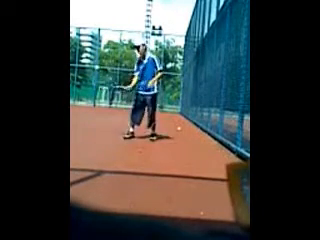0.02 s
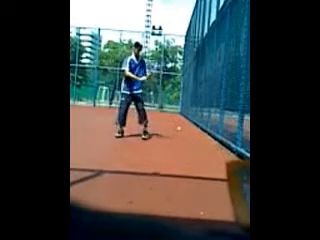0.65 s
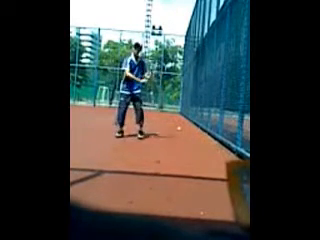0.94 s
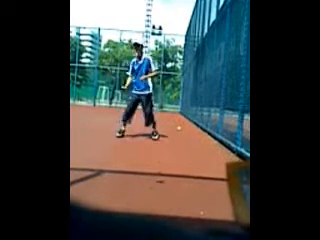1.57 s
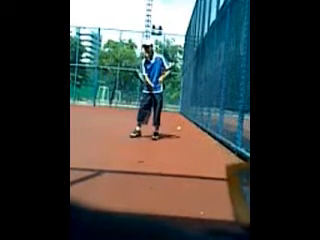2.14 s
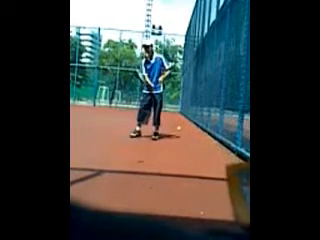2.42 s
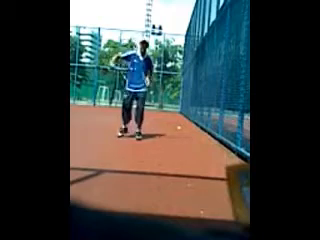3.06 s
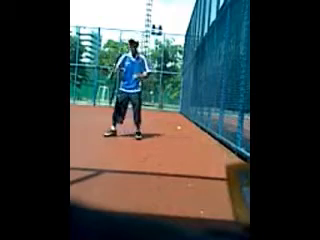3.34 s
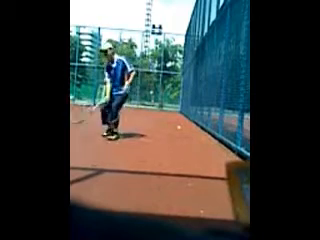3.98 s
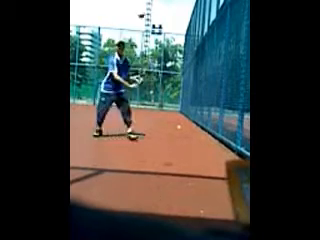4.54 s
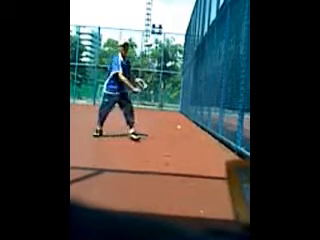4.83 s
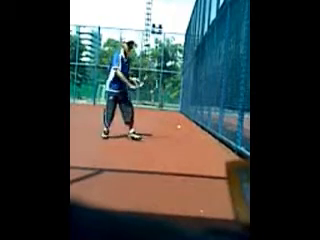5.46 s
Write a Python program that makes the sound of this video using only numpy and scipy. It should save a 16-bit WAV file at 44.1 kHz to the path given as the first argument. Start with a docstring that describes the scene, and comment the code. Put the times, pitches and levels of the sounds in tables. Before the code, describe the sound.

A tennis ball is hit against a practice wall on an outdoor court, with the microphone near the wall. The racket strikes farther off with a hollow pop and a thin, short echo at about 0.1, 1.1, 2.1, 3.0, 3.9, 4.8 and 5.7 seconds. In between, the ball meets the wall with a louder, hard, dry knock and pop at about 0.5, 1.5, 2.4, 3.4, 4.3 and 5.1 seconds. Shoes scuff softly, most clearly around 0.2, 1.8 and 3.2 seconds, with light, dull steps near 1.8, 2.7 and 5.4 seconds. Clothes swish very faintly after the strokes. Underneath, a distant engine gives a low, wavering hum and rumble, strongest in the first half second and slowly fading as it draws away. The whole sound is slightly dull, with little treble.

```python
"""Tennis against a practice wall

An outdoor hard court, the microphone near the wall, the player farther off. Each blow on racket or
wall is a knock and a crack at contact, then the hollow pop of the air in the ball as it springs back.
Shoes and clothes rustle between the strokes, and a distant engine hums and slowly draws away."""
import sys
import numpy as np
from scipy import signal
from scipy.fft import rfft, irfft
from scipy.io import wavfile

SR = 44100
rng = np.random.default_rng(int(sys.argv[2]) if len(sys.argv) > 2 else 0)


def wav_out(sig):
    """Save sig, one row per channel (or a flat mono array), as 16-bit PCM at SR to the path in sys.argv[1]."""
    wavfile.write(sys.argv[1], SR, np.round(np.clip(np.atleast_2d(sig).T, -1, 1) * 32767).astype(np.int16))


N = 251370
TIME = np.arange(N) / SR
FREQS = np.fft.rfftfreq(N, 1 / SR)

# racket strokes: start_s, knock_db, crack_db, dwell_s, pop_db, pop_hz, ground_db, court_db, swish_db
STROKES = [(0.0907, -14, -26.5, 0.0017, 5.5, 1085, -19, -13.5, -66),
           (1.088, -17.5, -24.5, 0.0029, 0.5, 1196, -12, -20.5, -57),
           (2.0511, -14.5, -22.5, 0.0026, -8, 1025, -0.5, -10, -68),
           (3.0082, -23.5, -26, .004, -6, 1200, -18.5, -12, -62.5),
           (3.9323, -13, -25, 0.00285, 3.5, 1030, -4.5, -11, -66.5),
           (4.8119, -18.5, -29, 0.00444, -1.5, 1053, -7.5, -7, -80.5),
           (5.6514, -26, -26.5, 0.0034, 0.5, 1068, -5.5, -13.5, -72)]


def amp(db):
    """Decibels to gain."""
    return 10 ** (np.asarray(db) / 20)


def unit(x):
    """Scales to rms 1."""
    return x / np.sqrt(np.mean(x ** 2) + 1e-20)


def read(points, hz):
    """Reads a curve on a log-frequency axis."""
    point_hz, value = np.transpose(points)
    return np.interp(np.log(hz + 1), np.log(point_hz), value)


def add(mix, start_s, sound):
    """Mixes a sound in at start_s."""
    part = mix[max(round(start_s * SR), 0):][:len(sound)]
    part += sound[:len(part)]


def noise(spectrum_db, n=N):
    """Noise of rms 1 with the given spectral shape."""
    return unit(irfft(rfft(rng.standard_normal(n)) * amp(spectrum_db), n))


def drift(hz):
    """Slow random motion of rms 1, up to about hz changes a second."""
    return noise(-10 * (FREQS / hz) ** 2)


def engine(flutter_db=2.0, waver=.011, throb=.55):
    """A far engine: a wavering hum that fades faster than the rumble around it."""
    # low rumble of the far engine, fading overall, swelling briefly with a shoe scuff: time_s, level_db
    rumble_levels = [(0, -27), (.5, -29), (.95, -35), (1.7, -35), (2.15, -35), (2.6, -35), (2.95, -40.5),
                     (3.25, -35), (3.6, -40), (4.6, -43), (5.15, -41), (5.7, -50.5)]
    # spectra of the low, middle and high engine noise: frequency_hz, relative_db
    rumble_shape = [(20, -30), (50, -23.5), (100, -14), (160, -10.5), (200, -1), (265, .5), (360, -11),
                    (450, -5), (545, -2.5), (650, -18), (900, -21.5), (1500, -64)]
    roar_shape = [(400, -15.5), (650, -1), (800, 4), (1000, -2), (1400, -8.5), (1900, -23), (2600, -28),
                  (4000, -55)]
    hiss_shape = [(900, 2), (1800, 5.5), (2700, 1.5), (3400, 0), (3900, -9.5), (4500, -20), (5000, -46)]
    rumble_db = np.interp(TIME, *np.transpose(rumble_levels))
    lost_db = rumble_db[0] - rumble_db
    # the pitch settles quickly as the engine eases off, then sags slowly
    hum_hz = 198.5 + 6 * np.exp(-TIME / .22) - 1.1 * TIME
    turns = np.cumsum(hum_hz * (1 + waver * drift(hz=9))) / SR
    tone = np.sin(2 * np.pi * turns) * (1 + throb * drift(hz=10))
    hum = amp(rumble_db[0] - 2 - 1.28 * lost_db) * unit(tone)
    rumble = amp(rumble_db) * noise(read(rumble_shape, FREQS))
    nearest_s, passing_s = 0.069, 0.24
    distance = np.hypot(1, (TIME - nearest_s) / passing_s)  # 1 at the nearest point
    roar = amp(-29) / distance * noise(read(roar_shape, FREQS))
    hiss = amp(-54.5 - 0.91 * lost_db) * noise(read(hiss_shape, FREQS))
    # moving air makes the far noise flutter
    return hum + sum(part * amp(flutter_db * drift(hz=18)) for part in (rumble, roar + hiss))


def ring(t, hz, t60, swell_s):
    """A resonance that swells up from t = 0 and dies away."""
    t = np.maximum(t, 0)
    return np.sin(2 * np.pi * hz * t) * (1 - np.exp(-(t / swell_s) ** 2)) * 10 ** (-3 * t / t60)


def blow(modes, knock_db, knock_hz, dwell_s, pop_db, pop_hz, pop_t60, swell_s, ground_s, ground_db):
    """The ball knocks and flattens, then springs back and its air pops, echoed by the ground."""
    t = np.arange(SR // 4) / SR
    # pressed flat, the ball is heavily damped; the struck body rings along
    knock = ring(t, knock_hz, t60=0.013, swell_s=0.00054)
    body = sum(amp(db) * ring(t, hz, t60, swell_s=0.00057) for hz, db, t60 in modes)
    pop = ring(t - dwell_s, pop_hz, pop_t60, swell_s)
    ground_echo = amp(ground_db) * ring(t - dwell_s - ground_s, pop_hz, pop_t60, swell_s)
    return amp(knock_db) * (knock + body) + amp(pop_db) * (pop + ground_echo)


def crack(snap_s, rise_s, scatter_db, scatter_t60, top_hz, slap_t60=.032, snap_db=-4):
    """The felt slaps and the shell snaps back; the ground scatters both and swallows their top."""
    # spectrum of slapped felt and rubber: frequency_hz, relative_db
    felt_shape = [(40, -15), (200, 1.5), (700, 17.5), (1400, 15), (1950, 0.5), (2700, 1.5), (3400, 6),
                  (4000, -5), (4600, -9), (5100, -37)]
    t = np.arange(SR // 4) / SR
    hz = np.fft.rfftfreq(len(t), 1 / SR)
    felt_db = read(felt_shape, hz)
    felt = noise(felt_db, len(t))
    dull_felt = noise(felt_db - 10 * np.log10(1 + (hz / top_hz) ** 20), len(t))
    slap = amp(-60 * t / slap_t60)
    snap = amp(snap_db) * np.exp(-((t - snap_s) / .003) ** 2)
    scatter = amp(scatter_db - 60 * t / scatter_t60)
    return (np.hypot(slap, snap) * felt + scatter * dull_felt) * (1 - np.exp(-t / rise_s))


def echoes(x, gain_db):
    """The direct sound with its single echoes off fence and ground."""
    # early reflections: delay_s, relative_db
    reflections = [(0.01, -16), (0.016, -22.5), (0.0202, -25), (.0315, -35)]
    out = x.copy()
    for delay_s, db in reflections:
        add(out, delay_s, amp(db + gain_db) * x)
    return out


def court(x, build_up_s=0.0018, taps_per_s=1200):
    """The open court's thin tail, scattered by fences and trees."""
    # decay of the tail: frequency_hz, t60_s
    decay = [(200, 4), (1000, 0.44), (3500, 0.5)]
    # colour of the tail: frequency_hz, relative_db
    colour = [(150, -4.5), (650, -8.5), (1080, -5.5), (1600, 2.5), (3300, -5), (3900, -10), (4800, -7)]
    t = np.arange(SR) / SR
    taps = rng.standard_normal(SR) * (rng.random(SR) < taps_per_s / SR)
    taps *= 1 - np.exp(-(t / build_up_s) ** 2)
    hz, age_s, spectra = signal.stft(taps, SR, nperseg=256)
    spectra *= amp(read(colour, hz)[:, None] - 60 * age_s / read(decay, hz)[:, None])
    tail = signal.istft(spectra, SR, nperseg=256)[1]
    return signal.fftconvolve(x, tail / np.linalg.norm(tail))[:N]


def racket(swell_s=0.0017, pop_t60=0.025):
    """The racket, farther from the microphone, pops higher and carries more of the court."""
    # racket resonances: pitch_hz, relative_db, t60_s
    modes = [(307, -20, 0.22), (664, -4, 0.031), (1340, -11.5, 0.011), (2580, -29.5, 0.041),
             (3220, -26.5, 0.044)]
    direct, to_court = np.zeros(N), np.zeros(N)
    for start_s, knock_db, crack_db, dwell_s, pop_db, pop_hz, ground_db, court_db, _ in STROKES:
        knock_hz = 1.06 * pop_hz  # taut strings pitch the knock above the pop
        pock = blow(modes, knock_db, knock_hz, dwell_s, pop_db, pop_hz, pop_t60, swell_s,
                    ground_s=.0053, ground_db=ground_db)
        slap = crack(dwell_s + swell_s, rise_s=0.0019, scatter_db=-8, scatter_t60=0.17, top_hz=4240)
        hit = pock + amp(crack_db) * slap
        add(direct, start_s, hit)
        add(to_court, start_s, amp(court_db) * hit)
    return echoes(direct, gain_db=-3) + court(to_court)


def rub(hz, octaves, top_hz=3900):
    """The noise of sole or cloth rubbing, in a band round hz."""
    offset = np.log2((FREQS + 1) / hz) / octaves
    band_db = -20 * np.log10(1 + (2 * offset) ** 2 + offset ** 4)
    return noise(band_db - 10 * np.log10(1 + (FREQS / top_hz) ** 18))


def swell_at(middle_s, length_s):
    """A soft swell, loudest at middle_s."""
    return np.exp(-(2 * (TIME - middle_s) / length_s) ** 2)


def clothes_and_soles(swish_lag_s=0.16, grain_db=1.5):
    """Clothes swish on each follow-through and soles scuff between strokes, in soft, grainy swells."""
    # shoes rubbing the court: middle_s, length_s, level_db, centre_hz, width_octaves
    scuffs = [(0.201, 0.052, -35, 1300, 0.7), (0.689, 0.28, -51.5, 1690, 0.92), (1.836, 0.16, -36, 828, .5),
              (1.923, 0.24, -50.5, 1850, 0.88), (2.806, 0.12, -60.5, 2750, 0.54),
              (2.824, 0.15, -53, 1480, 0.44), (2.982, 0.073, -62, 2780, 0.16),
              (3.225, 0.21, -42, 1200, 0.83), (3.767, 0.067, -67, 2160, 1), (4.203, 0.25, -54, 1200, 1),
              (4.496, 0.9, -62.5, 1460, 0.42), (5.043, 0.17, -62, 1710, 0.58)]
    swishes = sum(amp(db) * swell_at(s + swish_lag_s, length_s=0.29) for s, *_, db in STROKES)
    cloth = rub(hz=2680, octaves=0.59) * swishes
    soles = sum(amp(db) * rub(hz, width) * swell_at(s, length) for s, length, db, hz, width in scuffs)
    return (cloth + soles) * amp(grain_db * drift(hz=120))


def wall(swell_s=0.0022):
    """The ball meets the wall close to the microphone and cracks hard and dry."""
    # rebounds: start_s, knock_db, crack_db, dwell_s, pop_db, pitch_hz, pop_t60_s, court_db
    rebounds = [(0.4956, 5, -13.5, .0031, 6.5, 1026, 0.03, -27),
                (1.4551, 5.5, -13, .0044, 11, 1002, 0.023, -28.5),
                (2.4378, 4.5, -13, .0042, 9, 1010, 0.022, -27),
                (3.3811, 3.5, -17.5, .0041, 8, 1035, 0.021, -20.5),
                (4.286, -4.5, -14, .0042, 8, 1020, 0.026, -19.5),
                (5.14117, 3, -16, .0041, 7, 1010, .026, -28.5)]
    # wall resonances: pitch_hz, relative_db, t60_s
    modes = [(291.6, -19.5, 0.019), (436, -8, 0.013), (740, -15, 0.019), (849, -12, 0.018),
             (1356, -14, 0.016), (1630, -23, 0.014), (3520, -19.5, 0.0066)]
    direct, to_court = np.zeros(N), np.zeros(N)
    t = np.arange(SR // 4) / SR
    for start_s, knock_db, crack_db, dwell_s, pop_db, hz, t60, court_db in rebounds:
        pock = blow(modes, knock_db, hz, dwell_s, pop_db, hz, t60, swell_s,
                    ground_s=.0075, ground_db=-12)
        slap = crack(dwell_s + swell_s, rise_s=0.00059, scatter_db=-16.5, scatter_t60=0.14, top_hz=3900)
        # the rubber shell rings as it snaps back
        shell = amp(-8) * ring(t - dwell_s, hz=3292, t60=0.016, swell_s=0.00058)
        hit = pock + amp(crack_db) * (slap + shell)
        add(direct, start_s, hit)
        add(to_court, start_s, amp(court_db) * hit)
    return echoes(direct, gain_db=-1.5) + court(to_court)


def steps(t60=0.074, rise_s=.001):
    """Short dull taps of rubber soles on the court."""
    # footfalls: start_s, level_db
    footfalls = [(1.79, -34), (2.722, -35), (5.433, -47)]
    # spectrum of a sole's tap: frequency_hz, relative_db
    sole_shape = [(100, -6.5), (400, 0), (800, -5), (1400, -15), (2200, -34), (3400, -28.5), (4600, -42.5)]
    envelope, t = np.zeros(N), np.arange(SR // 10) / SR
    for start_s, db in footfalls:
        add(envelope, start_s, amp(db - 60 * t / t60) * (1 - np.exp(-(t / rise_s) ** 2)))
    return envelope * noise(read(sole_shape, FREQS))


def low_pass(x, hz):
    """Steep low-pass."""
    return signal.oaconvolve(x, signal.firwin(255, hz, window=("kaiser", 8), fs=SR)[None], "same")


def scene():
    """The far engine, the rally and the player's movements, in mono."""
    return (engine() + racket() + clothes_and_soles() + wall() + steps())[None]


def record(dry):
    """A small narrow-band recorder limits the loudest pops, whose tips just clip."""
    thin = signal.sosfilt(signal.butter(2, 55, "highpass", fs=SR, output="sos"), dry)
    envelope = abs(signal.hilbert(thin))
    limited = thin / (1 + (envelope / 1.04) ** 12) ** (1 / 12)
    clipped = np.clip(low_pass(limited, hz=5000), -.96, .96)
    return low_pass(clipped, hz=10800)


dry = scene()
out = record(dry)
wav_out(out)
```